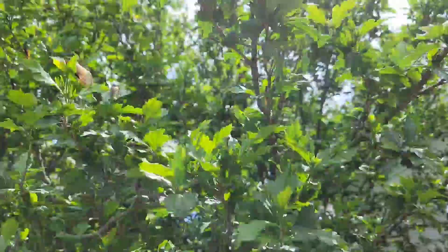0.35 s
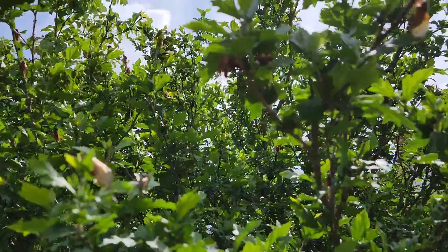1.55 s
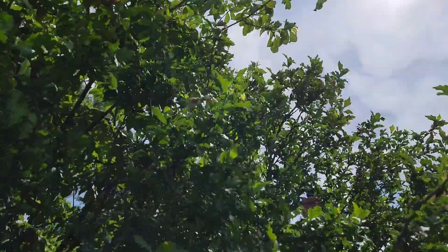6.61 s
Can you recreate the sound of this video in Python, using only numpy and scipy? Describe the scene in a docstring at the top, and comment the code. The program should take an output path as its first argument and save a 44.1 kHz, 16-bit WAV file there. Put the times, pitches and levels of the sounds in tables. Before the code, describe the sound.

A dense chorus of cicadas fills leafy trees for the whole six and a half seconds or so. Its shrill, high buzz sits over a slightly lower rasp and a distant, hollow drone, all somewhat stronger on the right, and eases only a little toward the end. At about 0.5 seconds a finger gives a tiny squeak on the microphone casing, followed at once by a sharp insect click on the right; a second click comes at 1.5 seconds. Closer cicadas swell and fade with fast, ticking buzzes, most clearly from 0.5 to 1.9 seconds, then more softly from 2.5 to 4 and from 4.8 seconds onward. A faint, very brief high blip sounds near 2.6 seconds. Underneath, light wind rumbles softly on the microphone in small gusts, mostly on the left, and fingers rub faintly on the casing, around 2.4 and 6.3 seconds.

```python
"""A shrill band of cicadas near 6 kHz fills the leafy trees, over a lower rasp and a far, hollow drone.
Every insect is a train of tymbal clicks scattered by leaves; a few closer ones stand out in turn.
Down at the microphone, light air rumbles on the two ports and a hand shifts on the casing at times."""
import sys
import numpy as np
from scipy import signal
from scipy.fft import rfft, irfft, next_fast_len
from scipy.io import wavfile
from scipy.ndimage import uniform_filter1d

SR = 44100
rng = np.random.default_rng(int(sys.argv[2]) if len(sys.argv) > 2 else 0)


def store_wav(level_fs):
    """Save 16-bit WAV to argv[1]."""
    pcm = np.round(np.clip(np.atleast_2d(level_fs), -1, 1) * 32767)
    wavfile.write(sys.argv[1], SR, pcm.T.astype(np.int16))


N = 298557
T = np.arange(N) / SR
SIZE = next_fast_len(N + SR // 4)
HZ = np.maximum(np.arange(SIZE // 2 + 1) * SR / SIZE, 1)
PORT_LAG_S = 0.000505  # sound from the right reaches the left port this much later

# Spectra of the open air and of wind on the ports. Each row: frequency in Hz, relative level in dB.
AIR_COLOUR = [(100, 3.5), (160, -0.5), (230, 1.5), (285, -6), (420, -6), (620, -9), (1000, -2.5),
              (1650, -8.5), (2100, -9.5), (3000, -11), (9000, -53)]
WIND_COLOUR = [(11, -30), (18, -15), (43, 3.5), (65, 2.5), (82, 2.5), (145, -11), (233, -15), (260, -24),
               (340, -56)]
# Gusts at the microphone. Each row: arrival in seconds, length in seconds, level in dB.
PORT_GUSTS = [(0.416, 0.58, -38.5), (1.223, 0.37, -42), (2.29, 0.034, -41), (2.67, 0.29, -45),
              (3.12, 0.75, -40), (4.57, 0.1, -39), (4.957, 0.94, -44.5)]
# Resonances of a rustle on the ports, the rubbed casing and the insects' bodies.
# Each row: centre in Hz, width in Hz, relative level in dB.
RUSTLE_MODES = [(180, 140, 3), (378, 350, -5.5)]
CASING_MODES = [(412, 440, 1), (770, 210, 1), (1200, 740, -1.5), (2050, 3600, -7.5)]
DRONE_MODES = [(1326.4, 248, 0.5), (1270, 487, -8.5)]
RASP_LEFT_MODES = [(4300, 2000, 3.2), (4900, 960, 1), (3120, 1420, -9.5)]
RASP_RIGHT_MODES = [(4220, 1730, 4.5), (5000, 1030, 2.5), (3265, 3300, -18.5)]
SHRILL_LEFT_MODES = [(5480, 1250, -1.6), (6320, 1420, 0.47)]
SHRILL_MODES = [(5640, 1200, 1.14), (6180, 1265, -1)]
OVERTONE_MODES = [(12200, 2560, 25.5), (14300, 2400, 19.5), (8800, 3000, -33)]
# Fingers on the casing. Each row: time in seconds, relative level in dB, half length in seconds.
FINGER_RUBS = [(0.494, -43, 0.0047), (0.509, -40.5, 0.0043), (0.532, -49, 0.0069), (1.077, -55, 0.044),
               (1.816, -52, 0.014), (2.412, -35.5, 0.0073), (2.436, -50, .01), (3.086, -49, 0.0086),
               (3.362, -44, 0.0083), (3.673, -49, 0.0072), (4.327, -49.5, 0.0072), (5.525, -46.5, 0.009),
               (5.743, -51, 0.0052), (6.27, -42.5, 0.0042), (6.298, -42, 0.009), (6.315, -52, 0.0055)]
# Closer insects. Each row: start and end in seconds, clicks per second, unevenness as a share of the
# period, body resonance and its width in Hz, level in dB, left minus right in dB.
NEAR_SONGS = [(0.0, 1.3, 154, 0.2, 6500, 1530, -35.5, -0.5), (0.45, 1.63, 132, 0.17, 5850, 1280, -25, -4),
              (1.243, 1.31, 200, 0.14, 5850, 1200, -20.5, -1),
              (1.25, 1.87, 196, 0.2, 6270, 650, -24.5, 0.5), (2.45, 4.1, 180, 0.3, 6650, 1370, -30, -1),
              (3.7, 5.8, 210, 0.2, 6400, 1410, -37, -6), (3.5, 4.9, 190, 0.4, 9500, 2400, -51, 10),
              (4.76, 5.36, 190, 0.01, 5770, 380, -23, -7), (5.1, 5.9, 198, 0.02, 5460, 700, -28, -8),
              (5.4, 6.6, 196, 0.1, 5820, 450, -31.5, -4)]
# Lone tymbal clicks. Each row: time in seconds, peak in dB, left minus right in dB.
LONE_CLICKS = [(0.536, -10, -10), (1.493, -9, -2)]
# Rise and fall of the chorus. Each row: time in seconds, relative level in dB, left minus right in dB.
RASP_LEVELS = [(0.3, -28.5, -8), (1.7, -29, -7.5), (3.3, -28, -5), (4.8, -28.5, -6.5), (5.3, -30, -7),
               (6.6, -30, -5.5)]
SHRILL_LEVELS = [(0.0, -22, -4.5), (1.42, -21.5, -4.5), (2.14, -23.5, -2), (3.43, -22, -0.5),
                 (4.07, -23, -4.5), (4.64, -23.8, -1), (5.06, -24.5, -4.5), (5.8, -24, -3.5),
                 (6.7, -25.5, 0)]
# Slow waves of the shrill overtone. Each row: crest in seconds, half length in seconds, rise in dB.
OVERTONE_WAVES = [(1.1, 0.7, 4.5), (3.617, 1.35, 7), (5.807, 0.67, 4)]


def undb(db):
    """Decibels to gain."""
    return np.exp(np.asarray(db) * (np.log(10) / 20))


def curves(table):
    """Each column of a timed table at every sample."""
    s, *columns = np.transpose(table)
    return [np.interp(T, s, c) for c in columns]


def unit(x):
    """Scale a sound to rms 1."""
    return x / np.sqrt(np.mean(x ** 2))


def pan(db):
    """Constant-power port gains for left minus right in dB."""
    gains = undb(np.array([db, -db]).reshape(2, -1) / 2)
    return gains / np.sqrt(np.mean(gains ** 2, axis=0))


def filtered(x, response):
    """Pass a sound through a frequency response; rms 1."""
    return unit(irfft(rfft(x, SIZE) * response, SIZE)[..., :N])


def body(modes):
    """Response of steep resonances whose powers add."""
    power = sum(undb(db) ** 2 / (1 + ((HZ ** 2 - hz ** 2) / (HZ * width)) ** 2) ** 3
                for hz, width, db in modes)
    return np.sqrt(power)


def colour(points):
    """Response through (Hz, dB) points."""
    hz, db = np.transpose(points)
    return undb(np.interp(np.log(HZ), np.log(hz), db))


def walk(per_s):
    """A smooth random wander with spread near 1."""
    return np.interp(T * per_s, np.arange(1024), rng.standard_normal(1024))


def pulse(s, db, half_s):
    """A brief envelope that rises to a peak and lets go."""
    return undb(db) / np.cosh(np.minimum(np.abs(T - s) / half_s, 20))


def branches(x, share, t60, size=4096):
    """Trunks and twigs add a brief fixed echo at each port, which ripples the spectrum finely."""
    echo = rng.standard_normal((2, size)) * np.exp(-np.log(1000) * np.arange(size) / SR / t60)
    echo *= np.sqrt(share / np.sum(echo ** 2, axis=1, keepdims=True))
    return x + signal.oaconvolve(x, echo, axes=1)[:, :N]


def open_air():
    """A faint outdoor floor arrives from far off through the trees."""
    far = branches(rng.standard_normal(N) + 1.63 * rng.standard_normal((2, N)), share=0.3, t60=0.19)
    return filtered(far, colour(AIR_COLOUR)) * undb(-48 + 0.9 * walk(6.3)) * pan(-1.9)


def gust(s, length_s, db, attack_s=0.22, sag_db_per_s=7, release_s=0.093):
    """Strength of one gust: it builds up, slackens steadily and drops away."""
    age = T - s
    attack = np.minimum(age, 0) / attack_s
    release = np.maximum(age - length_s, 0) / release_s
    return undb(db - sag_db_per_s * np.maximum(age, 0)) * np.exp(attack - release)


def wind():
    """Small eddies rumble mostly on the left port; the first gust brings a loose low rustle."""
    turbulence = 0.65 * rng.standard_normal(N) + rng.standard_normal((2, N))
    eddies = filtered(turbulence, colour(WIND_COLOUR))
    draught = undb(-51.5)
    breeze = np.sqrt(draught ** 2 + sum(gust(*row) ** 2 for row in PORT_GUSTS))
    rustle = filtered(rng.standard_normal((2, N)), body(RUSTLE_MODES))
    rustle *= gust(s=0.57, length_s=0.97, db=-50.5) * undb(2.9 * walk(29.8))
    flutter = undb(1.5 * walk(15))
    return (eddies * breeze * flutter + rustle) * pan(10.2)


def hand(squeak_s=0.5055, settled_hz=1793, fall_hz=87.2, fall_s=0.0034):
    """Fingers rub the casing; one sticks, squeaks by the right port and lets go with a soft bump."""
    friction = rng.standard_normal(N) + 0.8 * rng.standard_normal((2, N))
    pressure = sum(pulse(s, db + 5.5, half_s) for s, db, half_s in FINGER_RUBS)
    rubs = filtered(friction, body(CASING_MODES)) * pressure
    # the rough squeak falls in pitch and settles at its loudest moment
    pitch = settled_hz + fall_hz * np.clip((squeak_s - T) / fall_s, 0, 1)
    pitch *= 1 + 0.021 * walk(430)
    squeak = np.sin(2 * np.pi * np.cumsum(pitch) / SR) * pulse(squeak_s, db=-19, half_s=0.005)
    scrape = filtered(rng.standard_normal(N), body([(1600, 1100, 0)]))
    scrape *= pulse(s=0.505, db=-26, half_s=0.0067)
    bump = filtered(rng.standard_normal(N), body([(190, 200, 0)]))
    bump *= pulse(s=0.509, db=-40.5, half_s=0.0055)
    return rubs * pan(-3.5) + squeak * pan(-24) + scrape * pan(-11) + bump * pan(13)


def tone_blip():
    """A faint, very brief tone blip near 3.8 kHz, louder on the right."""
    return np.sin(2 * np.pi * 3785 * T) * pulse(s=2.589, db=-25, half_s=0.0055) * pan(-8)


def tymbal(rate, uneven, scatter_db, throb_db, drift=0.008, count=2400):
    """One insect's click times and sizes: the ribs buckle at a drifting rate while its effort throbs."""
    jitter, size, pace, effort = rng.standard_normal((count, 4)).T
    period = 1 + drift * unit(uniform_filter1d(pace, size=120)) + uneven * jitter
    times = np.cumsum(np.maximum(period, 0.1)) / rate - rng.random() / 10
    throb = unit(uniform_filter1d(effort, size=12))
    return times, undb(scatter_db * size + throb_db * throb)


def leaves(times, sizes, side, direct, spread_s, count=8):
    """Clicks arrive partly direct, later at the far port, and partly as echoes off stirring leaves."""
    ports = []
    for lag_s in (side * PORT_LAG_S / 2, -side * PORT_LAG_S / 2):
        delays = rng.exponential(spread_s, (len(times), count + 1))
        gains = rng.choice([-1, 1], delays.shape) * np.sqrt((1 - direct) / count)
        delays[:, 0], gains[:, 0] = lag_s, np.sqrt(direct)
        arrivals = ((times[:, None] + delays) * SR).astype(int)
        heard = (arrivals >= 0) & (arrivals < N)
        ports.append(np.bincount(arrivals[heard], (gains * sizes[:, None])[heard], N))
    return np.array(ports)


def swarm(rate, bearings, fan, direct, throb_db, spread_s, count):
    """Count insects around each bearing (-1 left, 1 right), each at its own pace near rate clicks/s."""
    out = 0
    for bearing in np.repeat(bearings, count):
        own_rate = rate * np.exp(0.14 * rng.standard_normal())
        times, sizes = tymbal(own_rate, uneven=0.06, scatter_db=0.5, throb_db=throb_db)
        side = np.clip(bearing + fan * rng.standard_normal(), -1, 1)
        out = out + leaves(times, sizes, side, direct, spread_s)
    return out


def drone():
    """A far group off to one side hums in a low, narrow band, reaching the ports in opposite phase."""
    clicks = swarm(230, bearings=[-0.74], fan=0.037, direct=0.73, throb_db=2, spread_s=0.012, count=12)
    hum = filtered(branches(clicks, share=0.046, t60=0.22), body(DRONE_MODES))
    return hum * undb(-32.5 + 1.4 * walk(13)) * pan(-4)


def soloists():
    """Closer to the microphone, single insects swell and fade, clicks distinct; two clicks snap out."""
    out = np.zeros((2, N))
    for start, end, rate, uneven, hz, width, db, pan_db in NEAR_SONGS:
        times, sizes = tymbal(rate, uneven, scatter_db=3, throb_db=1.9)
        clicks = leaves(times, sizes, side=-np.sign(pan_db), direct=0.2, spread_s=0.005, count=20)
        song = filtered(clicks, body([(hz, width, 0)]))
        swell = np.maximum(1 - ((2 * T - start - end) / (end - start)) ** 2, 0)
        out += song * swell * undb(db) * pan(pan_db)
    for s, db, pan_db in LONE_CLICKS:
        click = filtered(signal.unit_impulse(N, int(s * SR)), body(SHRILL_MODES))
        out += click / np.abs(click).max() * undb(db) * pan(pan_db)
    return out


def rasp(clicks, gain_db=3.5):
    """The raspers' bodies ring below the shrill band, louder at the right port."""
    level_db, pan_db = curves(RASP_LEVELS)
    bodies = np.array([body(RASP_LEFT_MODES), body(RASP_RIGHT_MODES)])
    song = filtered(branches(clicks, share=0.036, t60=0.099), bodies)
    return song * undb(level_db + gain_db) * pan(pan_db)


def shrill(clicks, gain_db=2.5, overtone_rest_db=-48):
    """The singers' bodies ring near 6 kHz, a little higher on the left, with a swelling overtone."""
    level_db, pan_db = curves(SHRILL_LEVELS)
    bodies = np.array([body(SHRILL_LEFT_MODES), body(SHRILL_MODES)])
    song = filtered(branches(clicks, share=0.011, t60=0.32), bodies)
    song *= undb(level_db + gain_db + 0.26 * walk(24)) * pan(pan_db)
    swell_db = sum(db * np.exp(-((T - s) / half_s) ** 2) for s, half_s, db in OVERTONE_WAVES)
    overtone = filtered(clicks, body(OVERTONE_MODES))
    return song + overtone * undb(overtone_rest_db + swell_db + 1.4 * walk(26))


def chorus():
    """Shrill singers and raspers click away in the trees on both sides of the microphone."""
    singers = swarm(197, [-1, 0.92], fan=0.04, direct=0.14, throb_db=1.1, spread_s=0.009, count=16)
    raspers = swarm(180, [-1, 0.95], fan=0.049, direct=0.25, throb_db=1, spread_s=0.012, count=14)
    return shrill(singers) + rasp(raspers)


def scene():
    """Everything that reaches the two ports among the trees."""
    return chorus() + drone() + soloists() + tone_blip() + hand() + open_air() + wind()


def record(dry):
    """The recorder cuts the top steeply."""
    top_hz = 15350
    return signal.sosfiltfilt(signal.ellip(10, 0.1, 70, top_hz, fs=SR, output="sos"), dry)


dry = scene()
out = record(dry)
store_wav(out)
```